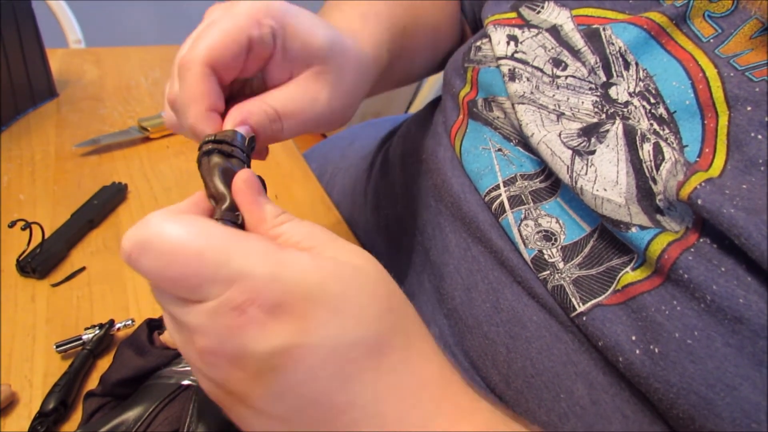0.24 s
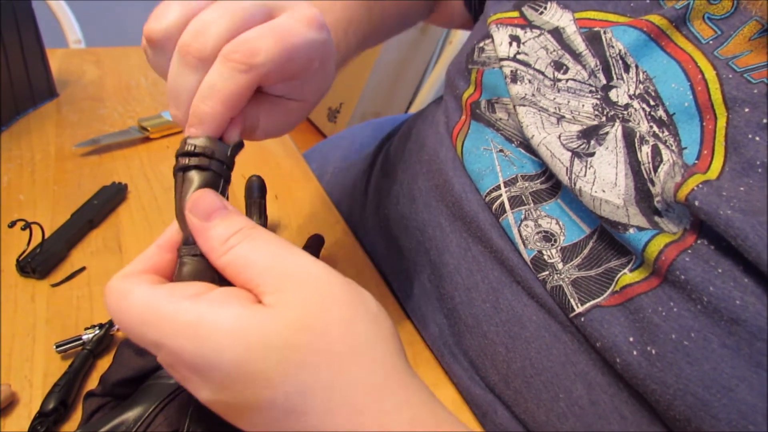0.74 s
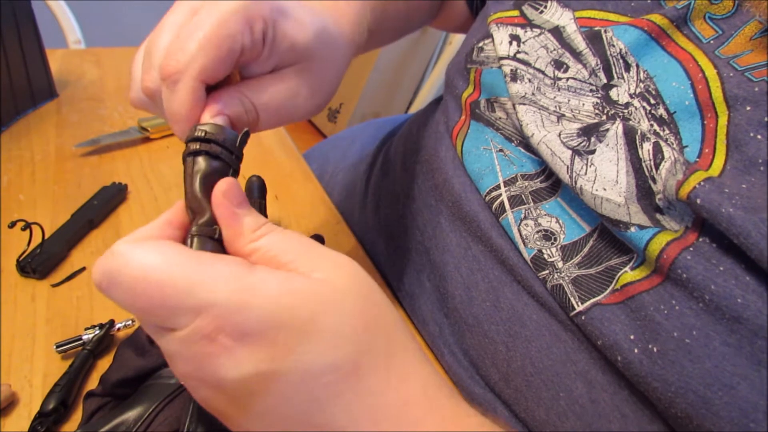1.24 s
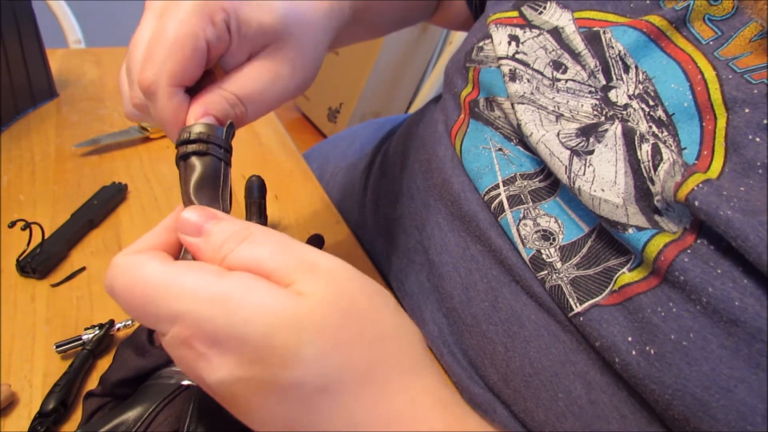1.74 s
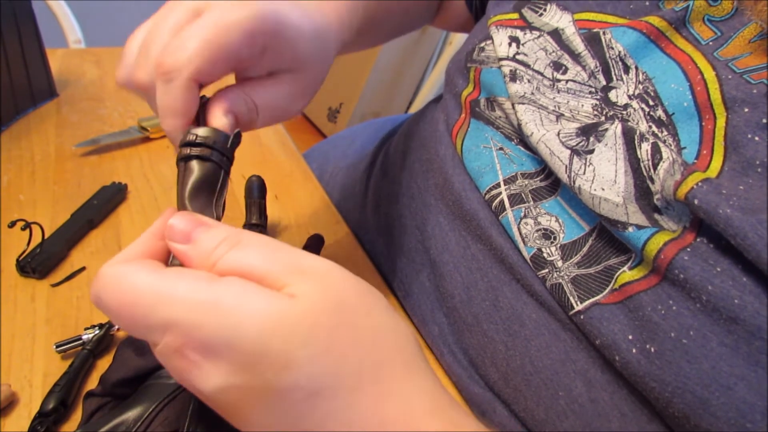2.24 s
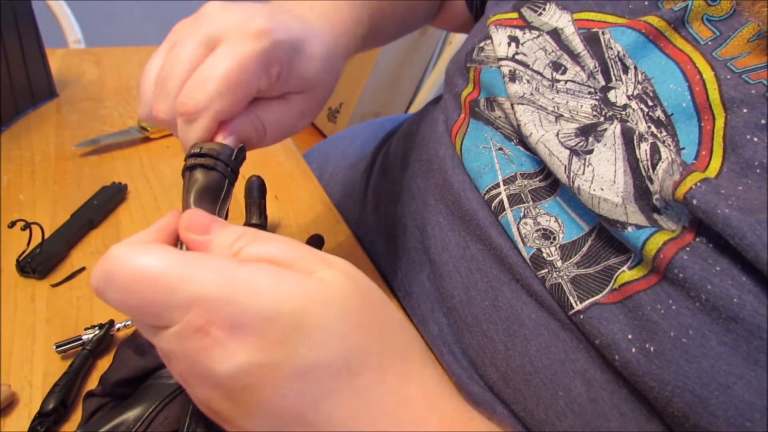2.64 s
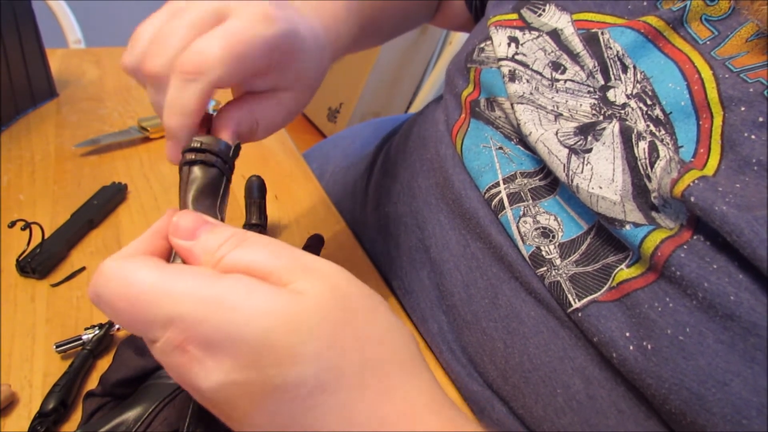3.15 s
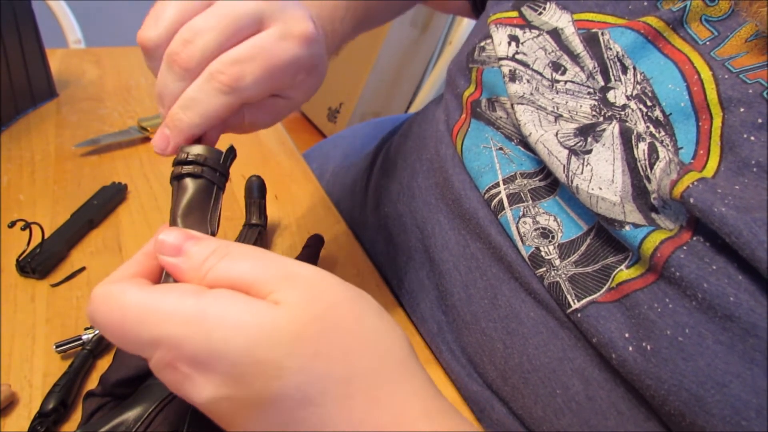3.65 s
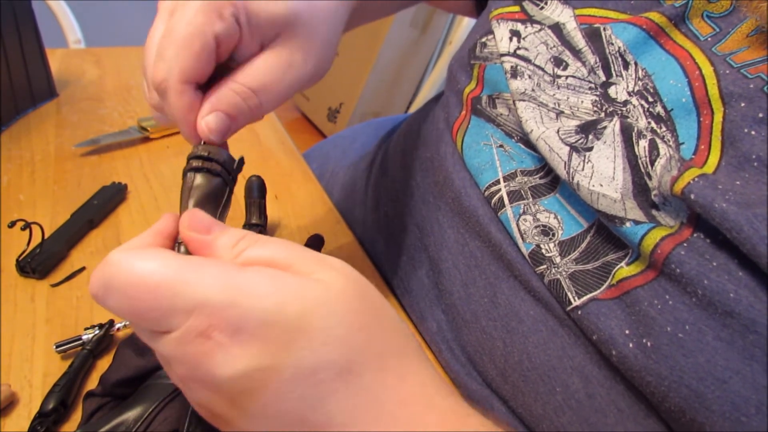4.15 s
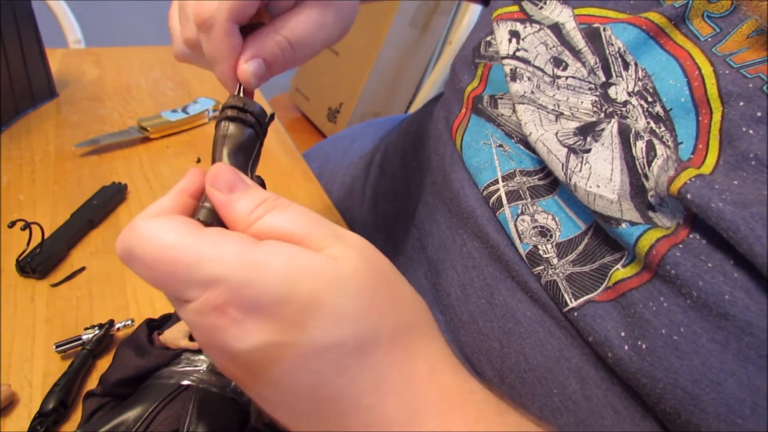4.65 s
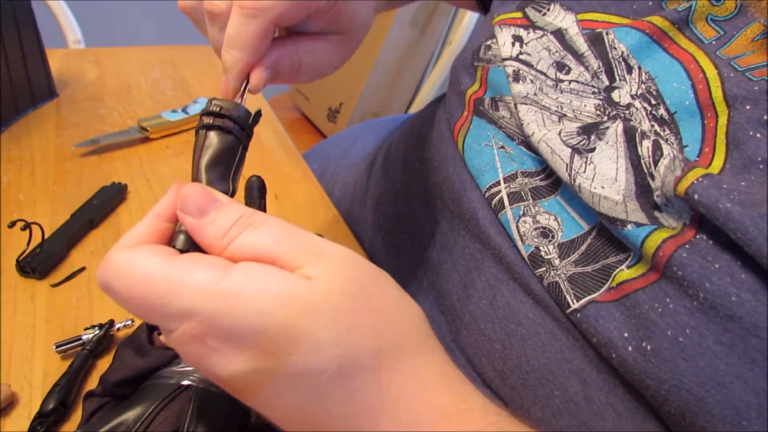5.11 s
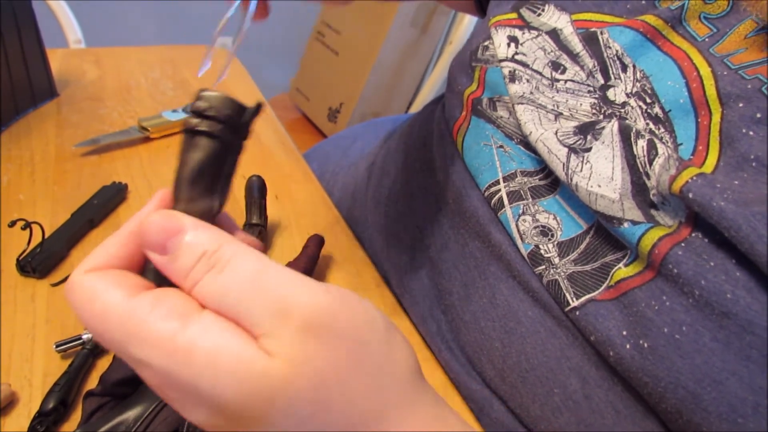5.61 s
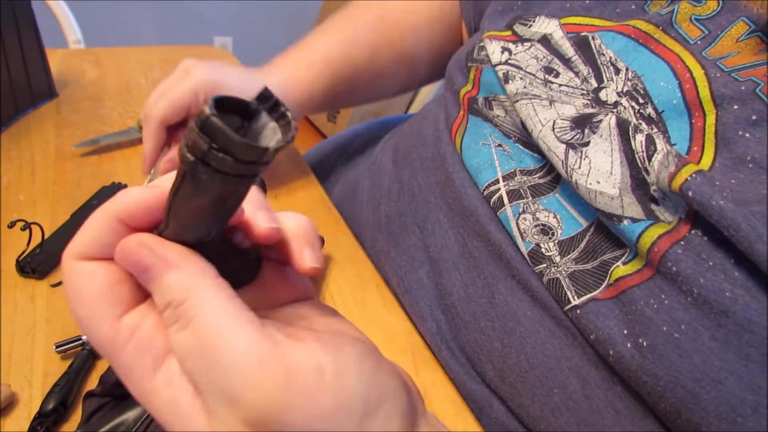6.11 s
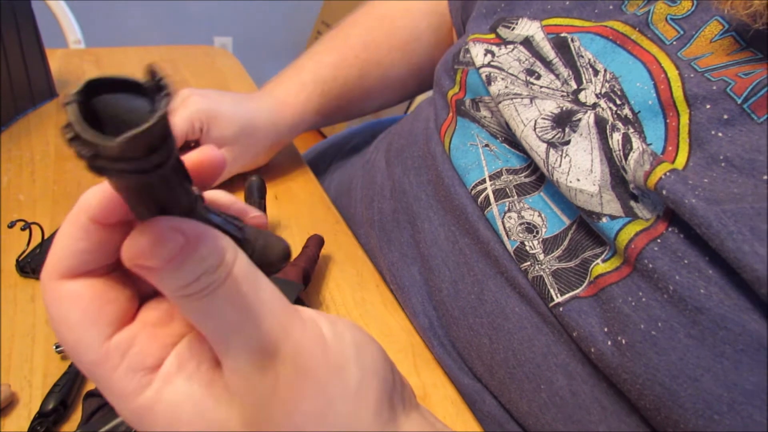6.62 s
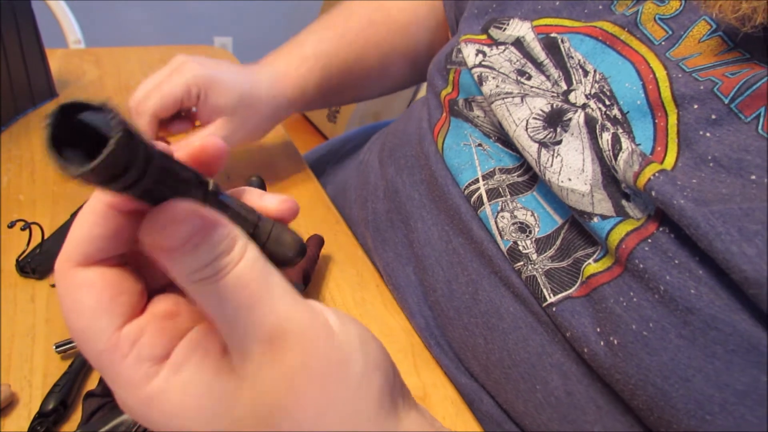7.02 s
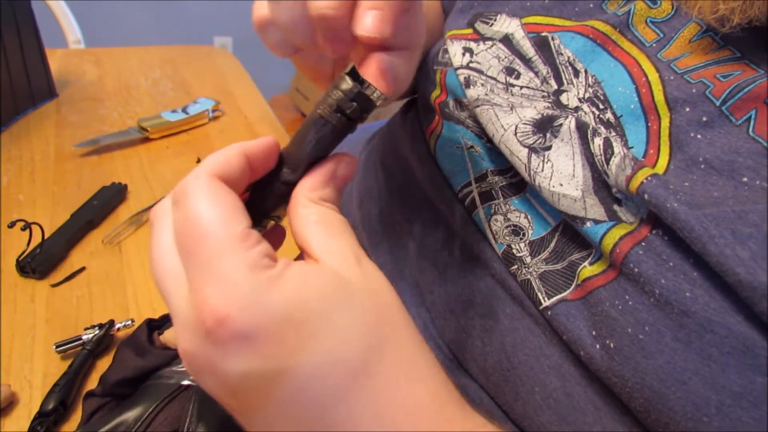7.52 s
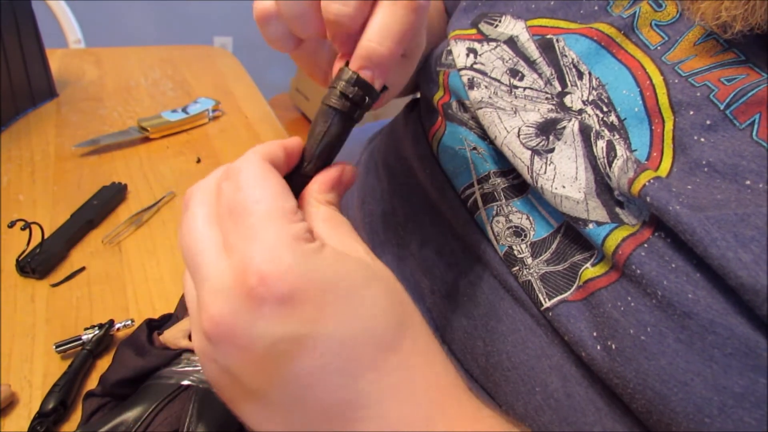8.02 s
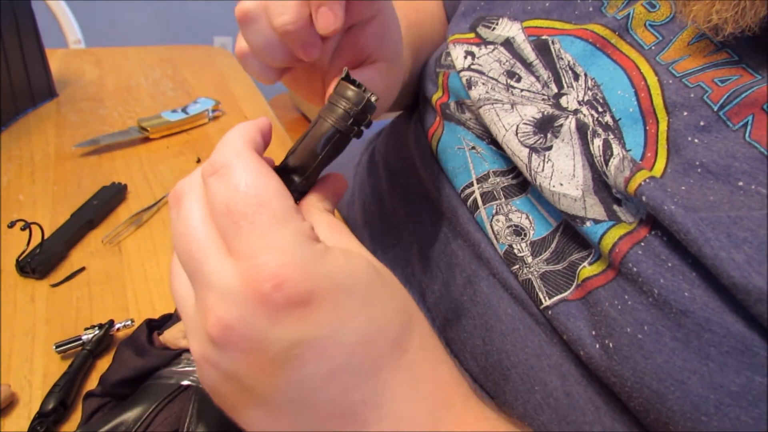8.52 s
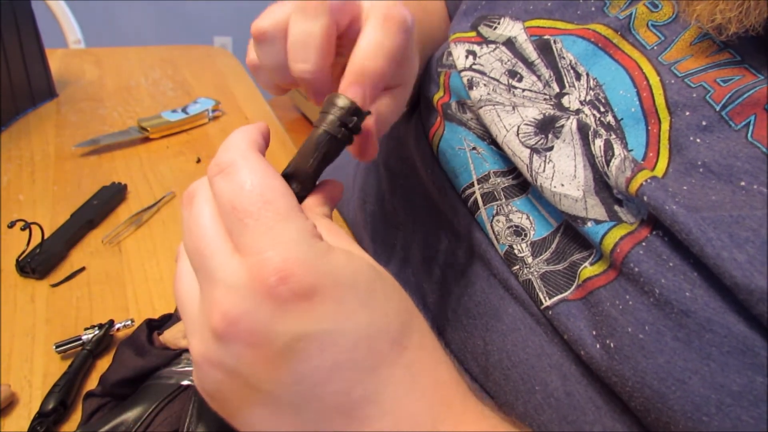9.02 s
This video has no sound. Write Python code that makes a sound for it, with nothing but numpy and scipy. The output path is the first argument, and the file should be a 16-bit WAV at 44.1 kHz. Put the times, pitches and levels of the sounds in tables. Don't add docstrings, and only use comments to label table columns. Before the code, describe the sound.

A close stereo microphone in a small room, with quiet air, soft hiss and faint low mains hum throughout. From 0 to 5.4 seconds fingers work at a hollow plastic boot: faint dry skin rubs, irregular high nail ticks and tiny hollow pops, clearer around 1.1, 1.9 and 3.7. At about 5.47 the part springs free with one very loud, bright, sharp snap, with a few small ticks after. From 6.16 steel tweezers patter on the wooden table, scrape and knock dully near 6.3, squeak faintly, then drop at 6.47 in a dense bright clatter, buzzing and ringing until about 6.75. The background dips, then recovers. Quiet rubbing resumes near 7.2, light ticks around 7.8 to 8, a hollow plastic pop at 8.12, and a small creak, ticks and stronger skin rub from 9.04 to the end.

```python
import sys
import numpy as np
from scipy import signal
from scipy.fft import rfft, irfft
from scipy.io import wavfile

SR = 44100
rng = np.random.default_rng(int(sys.argv[2]) if len(sys.argv) > 2 else 0)


def to_wav(sig):
    pcm = np.clip(np.atleast_2d(sig), -1, 1) * 32767
    pcm = np.round(pcm).astype(np.int16)
    wavfile.write(sys.argv[1], SR, pcm.T)


def volts_from_decibels(level):
    exponent = np.asarray(level, float) / 20
    return 10 ** exponent


N = 408366

# f/Hz, t60/s, sign of the first swing
BOOT_AIR = [(1197, 0.0066, -1.06), (2216, 0.0065, -0.82), (3420, 0.0031, 0.64)]
# t/s, first air mode level/dB, second mode above it/dB, edge above it/dB
POPS = [(0.0074, -49.5, -17, 19.5), (0.972, -58.5, 8, 27), (1.117, -35.5, 7.5, 15), (1.278, -47.5, -4, 3),
        (1.333, -54, 1, 0), (1.3532, -42.5, -2, 8), (1.3764, -45.5, -6, 9), (1.902, -42.5, 6, 14.5),
        (1.923, -50, -3, 18), (2.2315, -51, -3, 2), (2.672, -51.5, -4, 18), (3.6673, -34.5, -7, -2.5),
        (4.1016, -51.5, 5, 20.5), (4.189, -44.5, -9, 2), (4.206, -55.5, 11, 12), (4.478, -51, -8, 3),
        (5.4834, -40.5, 6.5, 11), (5.499, -49, 7, 2.5), (8.1207, -31.5, -12.5, 6.5), (8.138, -53, -13, -3),
        (9.05, -51, 2.5, 5), (9.072, -65, 1, 0), (9.192, -55, -4, 6)]
# t/s, peak level/dB, f/Hz
TICKS = [(0.442, -38, 7240), (0.741, -45, 8920), (0.815, -43, 7800), (0.959, -39, 6740),
         (0.972, -34.5, 7100), (1.0144, -43, 4190), (1.117, -26.5, 7000), (1.494, -40, 4800),
         (1.9022, -42, 7050), (1.673, -46, 7260), (2.0527, -45, 7670), (2.164, -41, 6330),
         (2.3062, -36.5, 4830), (2.3194, -38, 8250), (2.492, -33, 5000), (3.0617, -34.5, 4860),
         (3.145, -35, 5000), (3.5492, -38.5, 5260), (4.287, -38.5, 5810), (4.4947, -36, 5200),
         (5.325, -33, 7900), (5.4858, -23, 6000), (5.4889, -21.5, 9700), (5.4965, -30, 9700),
         (5.567, -34.5, 6100), (5.65, -43.5, 6110), (5.8454, -44, 4750), (5.852, -41, 7000),
         (6.0571, -40, 6100), (6.066, -42, 7500), (7.764, -37, 4100), (7.9075, -42, 7800),
         (7.9694, -41.5, 6550), (8.1115, -50, 9300), (8.116, -34, 8950), (9.157, -38, 7240)]
# t/s, peak level/dB, f/Hz, swell/s, t60/s
CREAKS = [(9.0405, -47, 1150, .006, 0.02), (9.046, -40.5, 1230, .003, 0.015),
          (9.044, -56, 4350, .004, 0.028), (9.056, -58, 4350, .002, 0.018), (9.077, -50, 1240, .002, .012),
          (5.488, -37, 2180, .002, .015), (5.4915, -39, 1030, 0.0013, 0.0086),
          (5.4985, -47, 2000, .002, 0.016), (.9055, -50, 1500, .002, .012), (.909, -49, 2340, .002, .012),
          (8.1207, -34, 1850, .0004, .007), (8.128, -43, 1250, .001, .01), (1.1235, -44, 1300, .001, .01),
          (1.1245, -45, 2700, .001, .01), (4.215, -52, 2100, .004, .04)]
POP_EDGE_HZ, POP_EDGE_SPREAD = 4300, .05
POP_CRACK, TICK_CRACK = 0.67, 0.74
TICK_AIR_DB, TICK_SECOND_DB = -25.5, 1.5
THIRD_MODE_DB = -16
HARDNESS = 0.33
TAP_PAN_SPREAD_DB = 5.5

# t/s, peak level/dB
SNAP = (5.4741, -0.78)
# f/Hz, width/Hz, level/dB
SNAP_MODES = [(2160, 790, -35), (3780, 270, 4), (6430, 590, -30), (6450, 400, 4), (8560, 1700, 24),
              (9800, 450, 2), (10100, 890, 19), (14600, 450, 11.5)]

# f/Hz, level/dB per Hz
RUB_COLOUR = [(700, -15), (1500, 9), (3000, 0), (6000, 1.5), (9000, -0.5), (13000, -8.5), (16000, -14.5)]
# t/s, rub plus hiss level/dB
GRIP = [(0.0, -58.5), (0.34, -64), (0.7, -62), (1.58, -65), (3.07, -64), (3.9, -64), (4.12, -58),
        (4.28, -64.5), (6.12, -64), (6.14, -85), (6.8, -72), (7.2, -66), (7.4, -65.5), (7.56, -60),
        (7.69, -63), (9.09, -66), (9.26, -53)]
HISS_IN_RUB_DB = -68
# t/s, length/s, level/dB, centre f/Hz
STROKES = [(0.204, 0.036, -55.5, 1700), (.468, 0.033, -57.5, 1800), (2.662, 0.045, -61, 2500),
           (2.909, 0.034, -57, 1700), (4.09, 0.037, -67, 3000), (4.469, 0.035, -58, 1250),
           (3.054, .03, -64, 4800), (0, 0.07, -58.5, 4020), (0.304, 0.066, -68, 7000),
           (0.499, 0.13, -62.5, 7000), (0.882, 0.065, -64, 7000), (1.119, 0.035, -54, 5500),
           (1.328, .014, -55, 7500), (1.12, .05, -55, 1900), (4.19, .06, -60, 5500),
           (5.478, .05, -52, 12500), (1.271, 0.073, -68, 8000), (1.942, 0.075, -65, 9000),
           (2.2, 0.12, -68.5, 9500), (2.336, .07, -67.5, 10000), (2.49, 0.03, -60.5, 5000),
           (2.664, 0.055, -60, 8000), (2.898, 0.072, -63.5, 7000), (3.037, 0.18, -66.5, 5940),
           (3.522, 0.074, -67, 6500), (4.184, 0.11, -56.5, 2640), (4.479, 0.09, -56.5, 8900),
           (4.469, 0.1, -58.5, 4530), (5.264, 0.1, -62.5, 7400), (5.42, 0.053, -58.5, 7300),
           (5.455, 0.02, -47, 6600), (5.545, 0.047, -56, 6000), (7.068, 0.078, -66.5, 8300),
           (7.344, 0.075, -66.5, 5000), (7.898, 0.13, -64.5, 8000), (8.104, 0.044, -54.5, 8500),
           (9.041, 0.019, -53, 10500), (9.055, 0.06, -62, 5000), (9.154, 0.13, -51.5, 8900),
           (9.148, .2, -59, 3900)]
# t/s, length/s, level/dB, centre f/Hz
SCUFFS = [
    (6.244, 0.057, -39.5, 1530),
    (6.245, 0.057, -50.5, 8100),
    (6.297, 0.057, -38.5, 1320),
    (6.3, 0.13, -59.5, 8300),
    (6.342, 0.097, -49, 1190),
]
RATTLE_S, RATTLE_DB, RATTLE_HZ = 0.026, -20.5, 1850

# t/s, peak level/dB, thud level/dB
TOUCHES = [(6.1589, -19.5, -17), (6.1605, -17.5, -8.5), (6.1627, -19, 1.5), (6.1637, -30, -6),
           (6.178, -17, 1), (6.1802, -19.5, 3), (6.1828, -22, -9), (6.189, -23.5, -23), (6.191, -25.5, -9),
           (6.1955, -23, -6), (6.2088, -26, -7), (6.2207, -29, -6), (6.239, -36, -6), (6.247, -31.5, -4),
           (6.2496, -31, -5.5), (6.2576, -31, -14), (6.2589, -32, -9), (6.261, -32, -12),
           (6.264, -28.5, -14), (6.2698, -33, -12.5), (6.2835, -33.5, -7), (6.2956, -35, -0.5),
           (6.3058, -18.5, 4.5), (6.3097, -31, 14), (6.3117, -23.5, 6), (6.315, -33.5, 1), (6.322, -35, 1),
           (6.3257, -32.5, 8), (6.329, -35, 10), (6.339, -35.5, 6), (6.3504, -34, 7), (6.3575, -35, 5),
           (6.3674, -40, 1), (6.384, -40, 0.5), (6.414, -43, -13.5)]
# t/s, peak level/dB
BOUNCES = [(6.472, 3), (6.4731, 4), (6.477, 9), (6.476, -13), (6.4781, -6), (6.4803, -11), (6.4896, -18),
           (6.493, -13.5), (6.4986, -11.5), (6.5016, -9), (6.512, -1), (6.514, -8), (6.515, 2.5),
           (6.5184, -11.5), (6.524, -8), (6.534, -6), (6.5384, 1.5), (6.539, -10.5), (6.5417, 1),
           (6.544, -15), (6.5571, -4), (6.5578, -13), (6.5594, -2.5), (6.563, -23), (6.573, -4),
           (6.576, -8), (6.578, -18), (6.578, -6), (6.5848, -17), (6.593, -5), (6.596, -15), (6.5988, -4.5),
           (6.6006, -13), (6.607, -22), (6.614, -15), (6.616, -12), (6.6213, -17), (6.629, -11),
           (6.632, -13), (6.634, -12.5), (6.644, -21), (6.648, -11), (6.653, -21), (6.654, -17),
           (6.663, -13.5), (6.665, -14), (6.676, -20), (6.691, -24), (6.706, -28), (6.7123, -32)]
# t/s, pressure level/dB
DRAG = [
    (6.157, -72.5),
    (6.16, -38),
    (6.2, -46.5),
    (6.232, -59),
    (6.266, -49.5),
    (6.292, -58),
    (6.304, -52),
    (6.396, -67.5),
    (6.46, -68),
]
# t/s, vigour level/dB
BUZZ = [
    (6.47, -87),
    (6.477, -25),
    (6.49, -29),
    (6.506, -29.5),
    (6.516, -30.5),
    (6.654, -40),
    (6.72, -54),
    (6.8, -64),
    (6.9, -63.5),
]
# t/s, peak level/dB, f/Hz, t60/s
SQUEAKS = [
    (6.414, -45, 1830, 0.03),
    (6.443, -46, 1810, 0.054),
]
# f/Hz, width/Hz, level/dB
TABLE_MODES = [(1240, 53, -7.5), (1550, 100, -2), (1760, 76, -6), (2070, 102, -2), (2340, 95, -2.5),
               (2660, 120, 5.5), (3130, 96, 2.5), (3460, 76, -6.5), (3800, 89, -8), (4500, 100, 1.5),
               (4170, 90, -6.5), (5090, 200, -17), (5580, 120, -30), (5950, 70, -34)]
# f/Hz, level/dB, t60/s
TABLE_KNOCKED = [(1350, -30, .03), (1810, -27, 0.044), (2180, -21, 0.063), (2500, -22, .03),
                 (2780, -27, 0.035), (5300, -40, 0.034), (6000, -30, .03)]
# f/Hz, level/dB, t60/s
DRAG_SINGS = [(3774, -15, 0.026), (3420, -17.5, 0.018), (1782, -21, 0.039), (5500, -25, .02)]
# f/Hz, level/dB, t60/s
STEEL_HELD = [(3800, -25, 0.1), (3907, -30.5, 0.14), (4090, -15, 0.023), (3580, -21, .03),
              (7260, -17.5, .025), (4750, -18.5, .025), (5000, -21, 0.046), (7540, -11.5, 0.02),
              (9900, -34, 0.047), (10320, -15, 0.024), (10570, -13, .02), (11300, -21, 0.027),
              (12600, -20, .015), (14200, -18.5, 0.05), (14600, -17, .03), (14950, -17, 0.03)]
STEEL_HZ = [6708, 7176, 7313, 9631, 10310, 10430, 12740, 14232, 14500]
# start t/s, swell/s, peak level/dB, t60/s
STEEL_FREE = [(6.474, 0.0079, -30.5, 0.58), (6.474, 0.0046, -23, 0.29), (6.474, 0.054, -29, 0.59),
              (6.525, 0.052, -24.5, 0.84), (6.48, 0.013, -32, 0.68), (6.49, 0.01, -35, 0.54),
              (6.48, .01, -41, .15), (6.478, 0.01, -25.5, 0.37), (6.478, 0.02, -29.5, 0.49)]
TOUCH_BRIGHT_DB, TOUCH_DULLS_DB_S, TOUCH_DULLEST_DB = 3.5, 298, -7.5
BOUNCE_BRIGHT_DB, BOUNCE_DULLS_DB_S, BOUNCE_THUD_DB = -16, 252, -49
DRAG_BRIGHT_DB, DRAG_RUMBLE_DB = -1, -6
BUZZ_BRIGHT_DB, BUZZ_RUMBLE_DB = -10, -14
CHATTER_DB, CHATTER_T60_S = -25, 0.022
HIT_PAN_SPREAD_DB = 5
GRIP_S = 6.2
HEEL_S, HEEL_CUT_HZ = 6.29, 1700
THUMP_HZ, THUMP_T60_S, THUMP_DB = 318, 0.046, -28
DROP_BASS_CUT_HZ = 520
DULL_S, DULL_HZ = 6.482, 10000
SHAKE, WOBBLE_RAD = 0.11, 0.27
SETTLED_S, SETTLE_S = 6.76, 0.041
TABLE_START = round(6.1 * SR)
TABLE_T = (np.arange(SR) + TABLE_START) / SR

# f/Hz, t60/s
ROOM_T60 = [(300, 0.25), (1500, 0.49), (5000, 0.32), (14000, 0.059)]
ROOM_DB, ROOM_GAP_S = -9.5, 0.0039
HAND_ROOM_DB = -6
HAND_LAG_S, TABLE_LAG_S = .000016, .000023

# f/Hz, level/dB per Hz
AIR_MID = [(12, -30), (20, -16.5), (81, -13), (188, -6), (217, -9), (242, -6.5), (287, -10.5), (339, -10.5),
           (723, -13), (930, -10.5), (2930, -22), (7830, -32.5), (13300, -34.5), (16200, -38)]
# f/Hz, level/dB per Hz
AIR_SIDE = [(12, -42.5), (20, -8), (117, 0), (229, 0), (279, 0), (723, -5.5), (904, -3), (1200, -9.5),
            (1870, -12.5), (2770, -17.5), (6250, -27.5), (8050, -26.5), (14500, -31), (16200, -42)]
AIR_MID_DB, AIR_SIDE_DB, AIR_PAN_DB = -56, -53, -1.5
# f/Hz, left level/dB, right level/dB
HUM = [(58, -72.5, -80), (123.5, -79.5, -76), (239.6, -61, -58)]
DUCK_FROM_DB, DUCK_SHARE, RELEASE_DB_S = -31, 0.42, 30
TOP_HZ = 15800

OPPOSED = np.array([[1], [-1]])


def unit(x):
    return x / np.sqrt(np.mean(x ** 2) + 1e-30)


def band(x, low_hz, high_hz):
    sos = signal.butter(2, [low_hz, min(high_hz, .45 * SR)], "band", fs=SR, output="sos")
    return signal.sosfilt(sos, x)


def pan(db):
    return volts_from_decibels(db / 2 * OPPOSED)


def in_time(rows):
    t, level = np.transpose(rows)
    return np.interp(np.arange(N) / SR, t, level)


def at_hz(points, hz):
    table_hz, values = np.transpose(points)
    return np.interp(np.log(hz + 1e-9), np.log(table_hz), values)


def coloured(x, spectrum):
    hz = np.fft.rfftfreq(x.shape[-1], 1 / SR)
    return unit(irfft(rfft(x) * volts_from_decibels(at_hz(spectrum, hz)), x.shape[-1]))


def ring(clicks, hz, t60):
    r, w = volts_from_decibels(-60 / (t60 * SR)), 2 * np.pi * hz / SR
    return signal.lfilter([0, np.sin(w)], [1, -2 * r * np.cos(w), r * r], clicks + 1e-18)


def ring_all(clicks, modes):
    return sum(volts_from_decibels(db) * ring(clicks, hz, t60) for hz, db, t60 in modes)


def burst(hz, t60, rise_s, size=2048):
    t = np.arange(size) / SR
    swell = (1 - np.exp(-t / rise_s)) ** 2
    wave = swell * volts_from_decibels(-60 * t / t60) * np.sin(2 * np.pi * hz * t)
    return wave / np.abs(wave).max()


def add(out, s, wave):
    i = round(s * SR)
    out[..., i:i + wave.shape[-1]] += wave


def grains(per_s, spread_db):
    sizes = volts_from_decibels(spread_db * np.minimum(rng.exponential(1, N), 4)) * rng.choice([-1, 1], N)
    return unit(sizes * (rng.random(N) < per_s / SR))


def edge_crack(hz, crack_share, luck):
    contact = 0.15 * luck * volts_from_decibels(-60 * np.arange(256) / SR / 0.008)
    contact[0] -= 1.5
    crack = band(contact, 3500, 9800)
    wave = -0.25 * burst(hz, 0.0061, rise_s=.0001)
    wave[:256] += crack_share * crack / np.abs(crack).max()
    return wave


def taps():
    out = np.zeros((2, N))
    touches = [(s, db + edge_db, db, db + second_db, None) for s, db, second_db, edge_db in POPS]
    for s, db, hz in TICKS:
        air_db = db + TICK_AIR_DB
        touches.append((s, db, air_db, air_db + TICK_SECOND_DB, hz))
    lucks = rng.standard_normal((len(touches), 264))
    for (s, edge_db, low_db, high_db, hz), luck in zip(touches, lucks):
        crack_share = TICK_CRACK if hz else POP_CRACK
        hz = hz or POP_EDGE_HZ * np.exp(POP_EDGE_SPREAD * np.clip(luck[5], -1, 2))
        wave = volts_from_decibels(edge_db + 1.0) * edge_crack(hz, crack_share, luck[8:])
        third_db = high_db + min(high_db - low_db, 6) + THIRD_MODE_DB
        swell_cycles = volts_from_decibels(-HARDNESS * min(edge_db - low_db, 16))
        for (air_hz, t60, sign), db, shift in zip(BOOT_AIR, (low_db, high_db, third_db), luck[1:]):
            held_hz = air_hz * (1 + .03 * shift)
            wave += sign * volts_from_decibels(db + 7.5) * burst(held_hz, t60, rise_s=swell_cycles / air_hz)
        add(out, s, wave * pan(TAP_PAN_SPREAD_DB * luck[0]))
    for s, db, hz, swell_s, t60 in CREAKS:
        add(out, s, volts_from_decibels(db) * burst(hz, t60, swell_s))
    return band(out, 510, 18000)


def snap():
    out = np.zeros((2, N))
    s, peak_db = SNAP
    wave = sum(volts_from_decibels(db) * burst(hz, 3.6 / width, rise_s=.00005) for hz, width, db in SNAP_MODES)
    wave = band(wave, 5200, 19000) + volts_from_decibels(-13) * band(wave, 1800, 4300)
    add(out, s, volts_from_decibels(peak_db) * wave / np.abs(wave).max() * pan(1))
    return out


def rubbing():
    level = np.sqrt(np.maximum(volts_from_decibels(in_time(GRIP)) ** 2 - volts_from_decibels(HISS_IN_RUB_DB) ** 2, 0))
    near = coloured(grains(9000, 2.4), RUB_COLOUR)
    spread = coloured(rng.standard_normal(N), RUB_COLOUR)
    return volts_from_decibels(1.5) * level * (near + 0.77 * spread * OPPOSED)


def strokes():
    out = np.zeros((2, N + SR))
    dry = grains(6400, 3.2) + 0.58 * rng.standard_normal(N) * OPPOSED
    rattles = [(s, RATTLE_S, db + RATTLE_DB, RATTLE_HZ) for s, db, *_ in POPS]
    for s, length, level_db, hz in STROKES + SCUFFS + rattles:
        share = np.linspace(0, 1, round(length * SR))
        first = round(.9 * s * SR)
        piece = band(dry[:, first:][:, :len(share)], hz / 1.5, hz * 1.5)
        swell = np.sin(np.pi * share ** 0.48) ** 0.74
        add(out, s, volts_from_decibels(level_db + 3.0) * unit(piece) * swell)
    return out[:, :N]


def prong_clatter():
    level_db = in_time(DRAG + BUZZ)[TABLE_START:TABLE_START + SR]
    here, there = grains(9000, 2.5)[:SR], grains(9000, 2.5)[:SR]
    blows = np.zeros(SR)
    for s, db in BOUNCES:
        add(blows, s - TABLE_START / SR, volts_from_decibels(np.array([db + CHATTER_DB])))
    chatter = signal.lfilter([1], [1, -volts_from_decibels(-60 / (CHATTER_T60_S * SR))], blows)
    return (volts_from_decibels(level_db) + chatter) * (here + .65 * there * OPPOSED)


def table_hits():
    hits = []
    for s, db, thud_db in TOUCHES:
        bright_db = TOUCH_BRIGHT_DB - TOUCH_DULLS_DB_S * (s - TOUCHES[0][0])
        hits.append((s, db, max(bright_db, TOUCH_DULLEST_DB), thud_db))
    for s, db in BOUNCES:
        bright_db = BOUNCE_BRIGHT_DB - BOUNCE_DULLS_DB_S * (s - BOUNCES[0][0])
        hits.append((s, db, bright_db, BOUNCE_THUD_DB))
    knocks, bright, thud = np.zeros((3, 2, SR))
    for (s, db, bright_db, thud_db), luck in zip(hits, rng.standard_normal((len(hits), 300))):
        roughness = 0.14 if s > HEEL_S else 0.27
        contact = roughness * luck * volts_from_decibels(db - 60 * np.arange(300) / SR / 0.0036)
        contact[0] -= 1.0 * volts_from_decibels(db)
        contact = contact * pan(HIT_PAN_SPREAD_DB * luck[-1])
        soft = HEEL_S < s < BOUNCES[0][0]
        at = s - TABLE_START / SR
        add(knocks, at, band(contact, 100, HEEL_CUT_HZ) if soft else contact)
        add(bright, at, contact * volts_from_decibels(bright_db))
        add(thud, at, contact * volts_from_decibels(thud_db))
    return knocks, bright, thud


def table_wood(knocks, bright, thud, buzz):
    dropped = TABLE_T > BUZZ[0][0]
    bright_db = np.where(dropped, BUZZ_BRIGHT_DB, DRAG_BRIGHT_DB)
    rumble_db = np.where(dropped, BUZZ_RUMBLE_DB, DRAG_RUMBLE_DB)
    drive = volts_from_decibels(4.5) * knocks + volts_from_decibels(8.5) * buzz
    modes = sum(volts_from_decibels(db - 26.5) * ring(drive, hz, 0.75 / max(width, 60)) for hz, width, db in TABLE_MODES)
    wood = band(band(drive, 1170, 6700) + modes, 640, 6200)
    wood = band(wood, 273, 7500)
    wood += ring_all((buzz + 0.33 * bright) * (TABLE_T < HEEL_S), DRAG_SINGS)
    wood += band(volts_from_decibels(5.5) * bright, 8100, 16000)
    wood += band(band(volts_from_decibels(10.5) * buzz * volts_from_decibels(bright_db), 5700, 11800), 3900, 9500)
    low = volts_from_decibels(2) * thud + volts_from_decibels(14.0) * buzz * volts_from_decibels(rumble_db)
    panel = 0.41 * ring(low, 324, 0.039) + 0.62 * ring(low, 585, 0.019) + 0.5 * ring(low, 696, 0.03)
    panel += 0.5 * ring(low, 825, 0.023) + 0.51 * ring(low, 1080, 0.014) + 0.42 * ring(low, 1300, 0.04)
    wood += volts_from_decibels(-18.5) * band(panel, 260, 1900)
    heel = thud * ~dropped
    thump = ring(heel, THUMP_HZ, THUMP_T60_S) + 0.98 * ring(heel, 208, 0.081)
    wood += volts_from_decibels(THUMP_DB) * band(thump, 61.3, 380)
    wood = np.where(dropped, band(wood, DROP_BASS_CUT_HZ, 19000), wood)
    dull = band(band(wood, 100, DULL_HZ), 100, DULL_HZ)
    wood = np.where(TABLE_T > DULL_S, dull, wood)
    for s, db, hz, t60 in SQUEAKS:
        add(wood, s - TABLE_START / SR, volts_from_decibels(db) * burst(hz, t60, rise_s=0.0036, size=4096))
    return wood


def steel_ringing(held):
    steel = band(ring_all(held, STEEL_HELD), 2600, 17000)
    size = SR // 2
    for hz, (s, swell_s, db, t60) in zip(STEEL_HZ, STEEL_FREE):
        shake, slip = (unit(band(noise, 8.2, 70)) for noise in rng.standard_normal((2, size)))
        wobble_rad = WOBBLE_RAD * (hz != STEEL_HZ[3])
        tone = signal.hilbert(burst(hz, t60, swell_s, size=size))
        shaken = tone * (1 + SHAKE * shake) * np.exp(1j * wobble_rad * slip)
        add(steel, s - TABLE_START / SR, volts_from_decibels(db) * shaken.real)
    return steel / (1 + np.exp(np.clip((TABLE_T - SETTLED_S) / SETTLE_S, -50, 50)))


def tweezers():
    buzz = prong_clatter()
    knocks, bright, thud = table_hits()
    held = bright * (TABLE_T < GRIP_S)
    wood = table_wood(knocks, bright, thud, buzz)
    wood += band(ring_all(held, TABLE_KNOCKED), 1000, 8000)
    out = np.zeros((2, N))
    add(out, TABLE_START / SR, wood * pan(0.8) + steel_ringing(held) * pan(1.6))
    return out


def ports(x, lag_s, widen_db):
    turn = np.exp(1j * np.pi * np.fft.rfftfreq(N, 1 / SR) * lag_s * OPPOSED)
    left, right = irfft(rfft(x) * turn, N)
    return (left + right) / 2 + volts_from_decibels(widen_db) * (left - right) / 2 * OPPOSED


def room(x):
    t, tail = np.arange(SR // 2) / SR, 0
    for low in 180 * 2 ** np.arange(7.):
        octave = band(rng.standard_normal((2, len(t))), low, 2 * low)
        tail = tail + octave * volts_from_decibels(-60 * t / at_hz(ROOM_T60, low * np.sqrt(2)))
    tail = tail * (t > ROOM_GAP_S)
    return signal.fftconvolve(x, tail / np.sqrt(np.sum(tail ** 2) / 2), axes=1)[:, :N]


def background():
    mid = volts_from_decibels(AIR_MID_DB) * coloured(rng.standard_normal(N), AIR_MID)
    side = volts_from_decibels(AIR_SIDE_DB) * coloured(rng.standard_normal(N), AIR_SIDE)
    out = (mid + side * OPPOSED) * pan(AIR_PAN_DB)
    t = np.arange(N) / SR
    for hz, left_db, right_db in HUM:
        out += np.sqrt(2) * volts_from_decibels(np.array([[left_db], [right_db]])) * np.sin(2 * np.pi * hz * t)
    return out


def scene():
    hands = ports(taps() + snap(), HAND_LAG_S, widen_db=3.5)
    table = ports(tweezers(), TABLE_LAG_S, widen_db=1.0)
    echo = volts_from_decibels(ROOM_DB) * room(volts_from_decibels(HAND_ROOM_DB) * hands + table)
    return hands + table + echo + rubbing() + strokes() + background()


def band_limit(x):
    return signal.sosfilt(signal.butter(12, 15600, fs=SR, output="sos"), x)


def record(dry):
    t = np.arange(N) / SR
    power = signal.lfilter([.001], [1, -.999], np.mean(dry ** 2, axis=0))
    level_db = 10 * np.log10(power + 1e-12)
    held_db = np.maximum.accumulate(level_db + RELEASE_DB_S * t) - RELEASE_DB_S * t
    excess_db = np.maximum(held_db - DUCK_FROM_DB, 0)
    duck_db = signal.lfilter([.005], [1, -.995], DUCK_SHARE * excess_db)
    cut = signal.sosfilt(signal.ellip(8, .1, 60, TOP_HZ, fs=SR, output="sos"), dry)
    return band_limit(np.clip(cut * volts_from_decibels(-duck_db), -1, 1))


dry = scene()
out = record(dry)
to_wav(out)
```